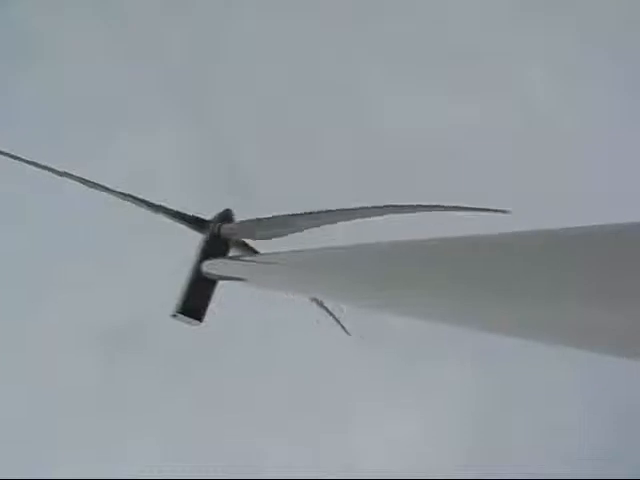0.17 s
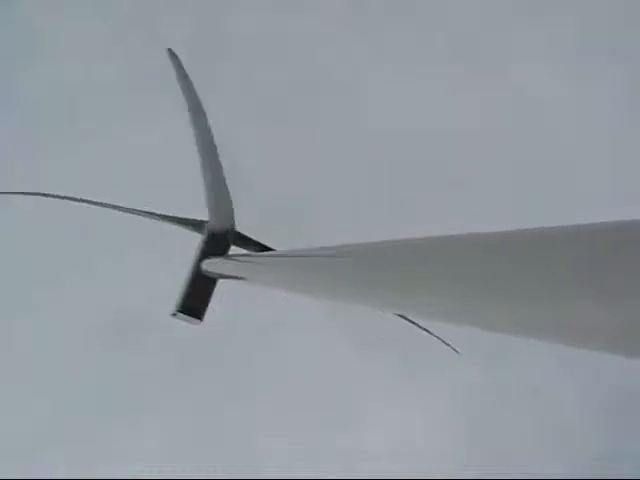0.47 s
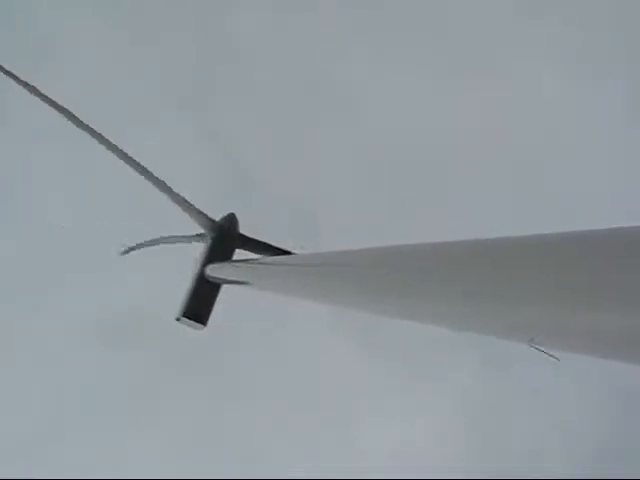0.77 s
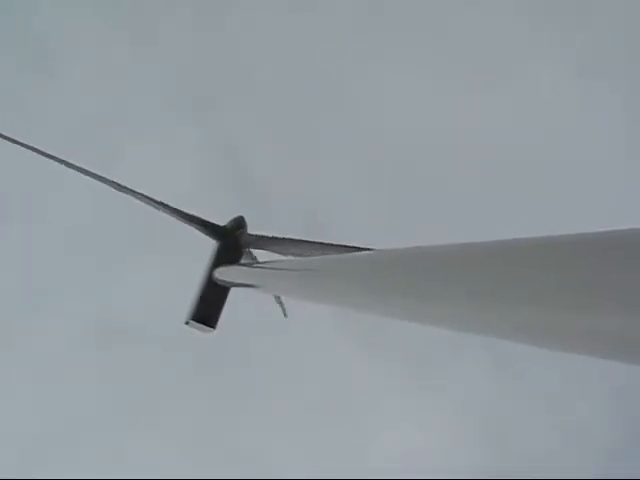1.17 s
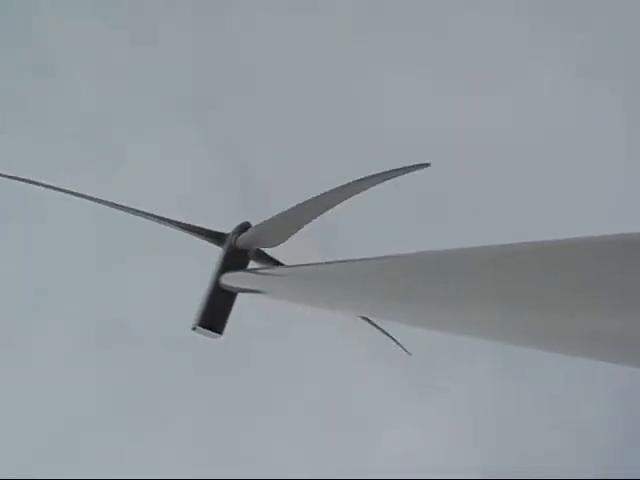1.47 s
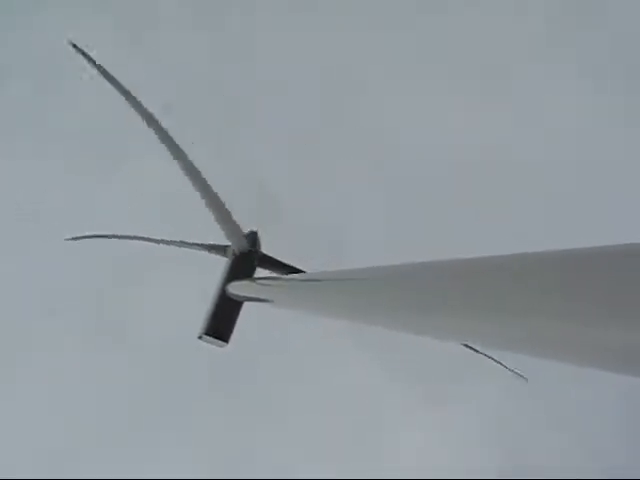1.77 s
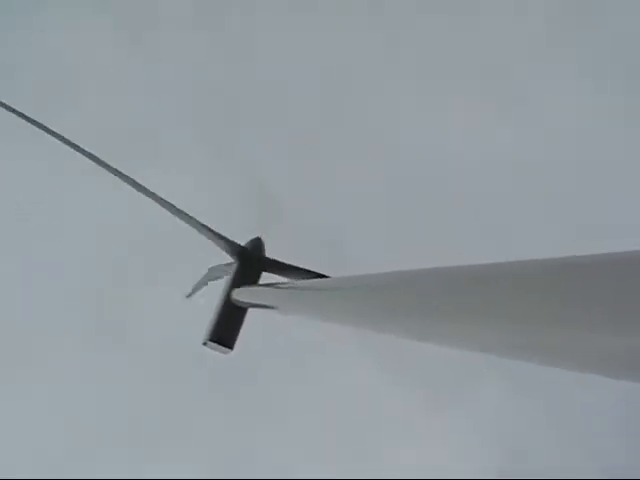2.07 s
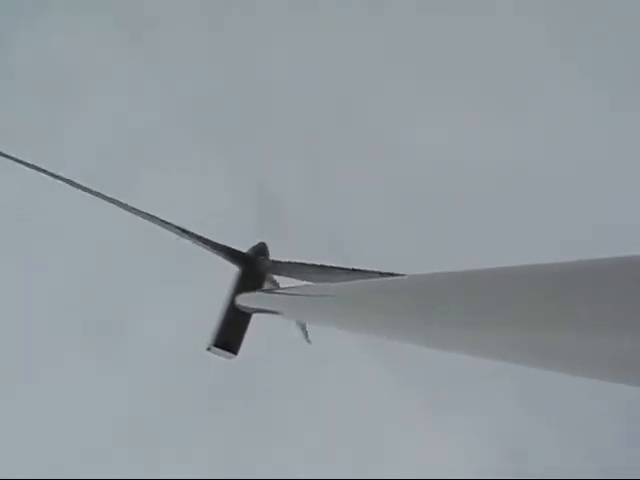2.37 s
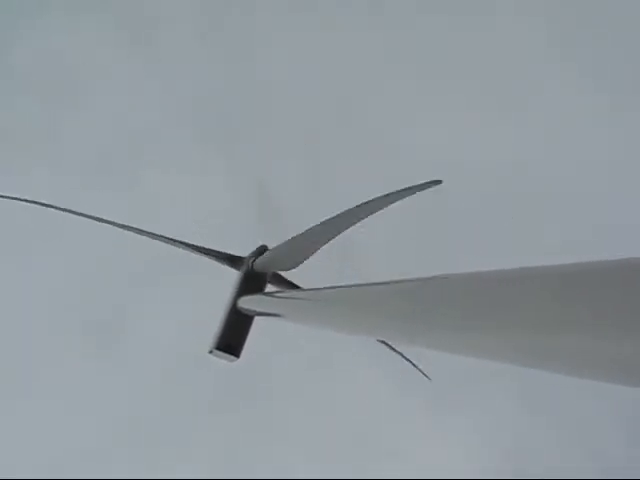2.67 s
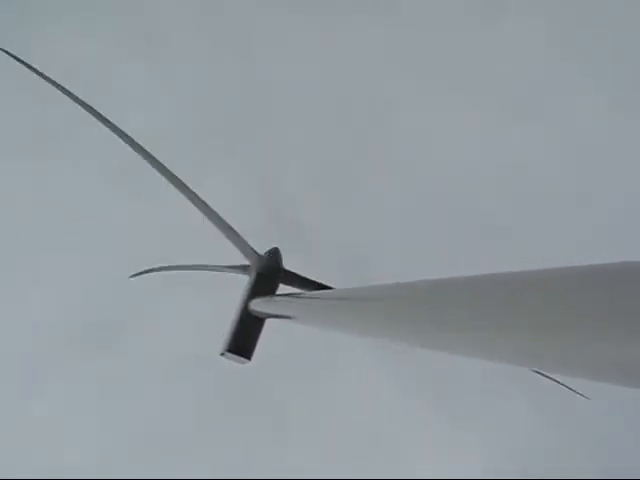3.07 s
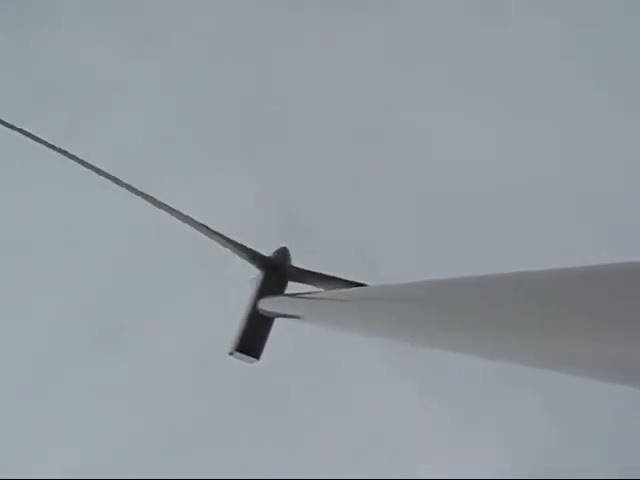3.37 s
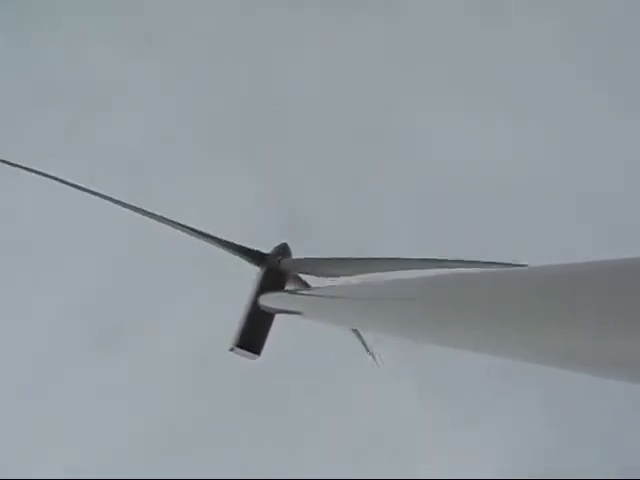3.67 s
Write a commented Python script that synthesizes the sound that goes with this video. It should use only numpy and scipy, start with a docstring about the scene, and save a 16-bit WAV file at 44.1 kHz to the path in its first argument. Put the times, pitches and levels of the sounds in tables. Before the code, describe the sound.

Strong wind buffets a cheap, unshielded microphone outdoors in irregular thumps and deep rumble; beneath it large turbine blades pass overhead with soft airy swishes, roughly one every second or less, over faint gritty hiss.

```python
"""Under a wind turbine: blades swish overhead while gusts buffet a small camera microphone.
The buffeting is a stream of short pressure puffs over rolling noise and a deep rumble; the strongest puffs
are placed one by one. The swish, its bright surges and a steady hiss are filtered noise; a small tick is
damped rings and the faint whistles are gliding tones.
The recorder samples slowly and holds each sample, mirroring the bass into the treble."""
import sys
import numpy as np
from scipy import signal
from scipy.io import wavfile

SR = 44100
rng = np.random.default_rng(int(sys.argv[2]) if len(sys.argv) > 2 else 0)


def dump_mix(stems):
    """Bounce the given channels to the path in sys.argv[1] as a 16-bit WAV at rate SR."""
    frames = np.atleast_2d(stems).T  # one column per channel
    limited = np.clip(frames, -1, 1)  # hard clip at full scale
    pcm = np.round(limited * 32767).astype(np.int16)
    wavfile.write(sys.argv[1], SR, pcm)


def boost(x):
    """Linear amplitude factor 10**(x/20) for a level x in decibels (scalar or array-like)."""
    u = np.asarray(x, float) / 20
    return 10 ** u


N = 168462   # length of the sound [samples]


def rms_one(x):
    """Scale to an rms (average strength) of 1."""
    return x / np.sqrt(np.mean(x ** 2) + 1e-20)


def in_time(rows):
    """Read every column of a timed table at every sample, with straight lines between rows."""
    times, *columns = np.transpose(rows)
    return [np.interp(np.arange(N) / SR, times, column) for column in columns]


def at_hz(points, hz):
    """Read a (frequency, value) table on a log-frequency axis."""
    table_hz, values = np.transpose(points)
    return np.interp(np.log(hz), np.log(table_hz), values)


def drift(rate_hz):
    """Random wandering of rms 1: noise smoothed twice, made at every 40th sample and joined by lines."""
    r = np.exp(-2 * np.pi * rate_hz * 40 / SR)
    noise = rng.standard_normal(N // 40 + 2002)
    slow = signal.lfilter([1], [1, -2 * r, r * r], noise)[2000:]   # leave out the filter's start
    return np.interp(np.arange(N) / 40, np.arange(len(slow)), rms_one(slow - slow.mean()))


def band_pass(x, low_hz, high_hz):
    """Keep the sound between two frequencies."""
    return signal.sosfilt(signal.butter(2, [low_hz, high_hz], "band", fs=SR, output="sos"), x)


def bands(spectrum, low_hz, count, moving_db):
    """Third-octave noise bands, each with its level and moving gain; together rms 1 at rest."""
    edges = low_hz * 2 ** (np.arange(count + 1) / 3)
    white = rng.standard_normal((2, N))
    out, power = 0, 0
    for k, (low, high) in enumerate(zip(edges, edges[1:])):
        hz = np.sqrt(low * high)
        # neighbouring bands take turns with two separate noises
        band = boost(at_hz(spectrum, hz)) * band_pass(white[k % 2], low, high)
        out = out + band * boost(moving_db(hz))
        power = power + np.mean(band ** 2)
    return out / np.sqrt(power)


def puff(clicks, hz):
    """Five smoothing filters turn each click into a smooth hump of the click's height."""
    r = np.exp(-2 * np.pi * hz / SR)
    for _ in range(5):
        clicks = signal.lfilter([1 - r], [1, -r], clicks + 1e-18)
    return clicks * SR / hz / 1.23   # brings the top of the hump back to the click's height


def port(x):
    """The microphone port passes no steady pressure: a high-pass filter."""
    return signal.sosfilt(signal.butter(2, 143.4, "high", fs=SR, output="sos"), x)


def hiss():
    """Steady hiss of the recorder: white noise."""
    return boost(-51.5) * rng.standard_normal(N)


def buffeting():
    """Random puffs of several widths, mostly upward, over a roll, fluttering under the gust; a rumble below."""
    # strength of the puffs and roll together: (time [s], level [dB])
    gust = [(.17, -25), (.27, -20), (.29, -22), (.32, -17), (.35, -38), (.38, -20), (.41, -22), (.48, -35),
            (.58, -17), (.62, -32), (.64, -24), (.78, -23), (.79, -31), (.95, -32), (.97, -24), (1.07, -28),
            (1.08, -17), (1.18, -24), (1.21, -33), (1.27, -19), (1.32, -26), (1.35, -21), (1.55, -32),
            (1.57, -21), (1.6, -34), (1.65, -19), (1.83, -28), (1.87, -21), (2.06, -23), (2.18, -21),
            (2.26, -27), (2.29, -17), (2.31, -25), (2.39, -21), (2.41, -28), (2.49, -32), (2.51, -21),
            (2.69, -27), (2.75, -32), (2.83, -24), (2.96, -27), (2.98, -21), (3.0, -27), (3.04, -20),
            (3.075, -21), (3.09, -28), (3.13, -28), (3.145, -18), (3.21, -22), (3.26, -30), (3.34, -26),
            (3.36, -20), (3.44, -25), (3.48, -18), (3.5, -31), (3.54, -27), (3.56, -35), (3.6, -26),
            (3.67, -25), (3.69, -30), (3.73, -26), (3.77, -40), (3.82, -28)]
    # widths of puff: (smoothing cutoff [Hz], height against the others [dB])
    puff_sizes = [(170, -1.5), (270, -3), (420, -5.5), (620, -7), (900, -14)]
    # colour of the turbulent roll between puffs: (frequency [Hz], relative density [dB per Hz])
    roll_colour = [(59, -31), (100, -5), (157, 2), (445, -6.5), (882, -22.5), (1000, -22), (1300, -52),
                   (2200, -120)]
    # colour of the deep rumble: (frequency [Hz], relative density [dB per Hz])
    rumble_colour = [(15, -37), (25, -9), (49, -2.5), (120, -2), (160, -30), (260, -120)]
    # strength of the deep rumble: (time [s], level [dB])
    rumble_level = [(0.17, -25.5), (0.24, -26), (0.35, -32), (0.41, -29), (0.46, -47), (0.59, -27),
                    (0.61, -46), (0.775, -25), (0.8, -42), (0.94, -47), (0.97, -23.5), (1.26, -35),
                    (1.34, -30), (1.4, -32.5), (1.85, -28.5), (1.93, -46), (2.09, -21.5), (2.12, -31),
                    (2.18, -31), (2.6, -29.5), (2.65, -21), (2.74, -38), (2.84, -26), (2.87, -38.5),
                    (2.99, -25), (3.82, -36)]
    puffs_per_s, spread_db, upward_share = 130, 2, .7
    roll_db = -3.5   # roll against the puffs
    flutter_db, flutter_hz = 2.08, 30

    height = boost(spread_db * np.minimum(rng.exponential(1, N), 3.5))
    direction = np.where(rng.random(N) < upward_share, 1, -1)
    born = rng.random(N) < puffs_per_s / SR
    clicks = height * direction * born
    size = rng.integers(0, len(puff_sizes), N)
    puffs = port(sum(boost(db) * puff(clicks * (size == k), hz) for k, (hz, db) in enumerate(puff_sizes)))

    roll = bands(roll_colour, low_hz=93.5, count=10, moving_db=lambda hz: 2.0 * drift(7.6))
    mix = rms_one(rms_one(puffs) + boost(roll_db) * roll)
    rumble = bands(rumble_colour, low_hz=23.43, count=7, moving_db=lambda hz: 2.0 * drift(4.8))
    gust_gain = boost(in_time(gust)[0] + flutter_db * drift(flutter_hz))
    return mix * gust_gain + rumble * boost(in_time(rumble_level)[0])


def swish():
    """Trailing-edge noise of the blades: noise bands that each follow the swing in their own share."""
    # course of the swish: (time [s], level before the lift below [dB], top octave against it [dB])
    swish_course = [(0.17, -38.5, -11), (0.18, -49, -3), (0.2, -42.5, -11), (0.21, -42.5, -11),
                    (0.29, -51.5, -6), (0.46, -47.5, -8), (0.55, -43.5, -7), (0.64, -43, -10),
                    (0.69, -44, -11), (0.73, -40, -13), (0.82, -41, -10), (0.91, -37.5, -15),
                    (1.01, -41, -12), (1.08, -38, -17), (1.13, -51, -6), (1.5, -50.5, -8.5),
                    (1.64, -40, -11), (1.69, -49, -4), (1.92, -48.5, -2), (1.95, -50.5, -8),
                    (1.99, -44.5, -10), (2.04, -54.5, -2), (2.09, -46.5, -9), (2.2, -48, -8.5),
                    (2.28, -43.5, -13), (2.37, -49, -6), (2.39, -47, -11), (2.43, -54.5, -6.5),
                    (2.74, -43.5, -14), (2.77, -40, -12.5), (2.95, -36.5, -16), (3.05, -42, -12),
                    (3.2, -50.5, -8.5), (3.345, -47.5, -11), (3.36, -51, -5), (3.42, -52, -9),
                    (3.76, -43.5, -9.5), (3.81, -42.5, -17), (3.82, -45, -6)]
    # colour of the swish: (frequency [Hz], relative density [dB per Hz])
    colour = [(200, -9), (500, 6), (950, 3), (1150, -7.5), (1600, -7.5), (2300, -6.5), (3100, -8.5),
              (4200, -13), (5500, -18)]
    # how far each pitch follows the level: (frequency [Hz], share of the swing [1])
    follows = [(300, 1.6), (900, 0.7), (1500, 0.76), (2500, 0.97), (4000, 0.87), (5500, 1.08)]
    # how far each pitch follows the top octave: (frequency [Hz], share of its swing [1])
    follows_top = [(2500, 0.019), (3500, 0.35), (4600, 0.85)]
    lift_db, patchy_db = 9.5, 0.79

    level, top = in_time(swish_course)
    swing, top_swing = level - level.mean(), top - top.mean()

    def moving_db(hz):
        """Gain of one band: its share of both swings and a little random patchiness."""
        shared = at_hz(follows, hz) * swing + at_hz(follows_top, hz) * top_swing
        return shared + patchy_db * drift(5.7)

    return boost(level.mean() + lift_db) * bands(colour, low_hz=181.6, count=15, moving_db=moving_db)


def ticks():
    """A small tick on the body: short rings that die away evenly in dB."""
    # the rings: (start [s], starting level [dB], pitch [Hz], time to fall by 60 dB [s])
    rings = [(0.1974, -19.5, 3100, 0.0039), (0.1984, -23, 1214, 0.04)]
    t = np.arange(N) / SR
    out = 0
    for s, db, hz, t60 in rings:
        fading = boost(db - 60 * np.maximum(t - s, 0) / t60) * (t > s)
        out = out + fading * np.sin(2 * np.pi * hz * (t - s))
    return out


def slaps():
    """The strongest puffs and drops in pressure: a sharp hump, up or down, that swings back in the port."""
    # strongest single puffs: (time of the top [s], height before the port [dB], smoothing cutoff [Hz])
    pushes = [(0.224, -7.5, 600), (0.268, -6.5, 915), (0.308, -11, 740), (0.318, -8, 790), (0.386, -3, 835),
              (0.405, -16, 720), (0.562, -9.5, 810), (0.593, -11, 855), (0.719, -6.5, 900),
              (0.767, -10, 860), (1.079, -6.5, 960), (1.088, -4.5, 860), (1.17, -9.5, 1060),
              (1.244, -13.5, 935), (1.274, -2.5, 810), (1.301, -8, 750), (1.358, -6, 720),
              (1.654, -12, 880), (1.667, -5, 935), (1.734, -12.5, 1150), (1.742, -10, 520),
              (1.772, -11, 686), (1.809, -13.5, 517), (1.854, -6.5, 650), (1.876, -8, 1000),
              (1.928, -12, 750), (1.935, -11.5, 910), (1.965, -12, 870), (2.008, -7.5, 870),
              (2.017, -9.5, 1080), (2.056, -8.5, 1320), (2.072, -19, 1000), (2.088, -7.5, 1280),
              (2.111, -10.5, 920), (2.16, -8, 750), (2.185, -14, 600), (2.208, -3.5, 646),
              (2.288, -18, 800), (2.337, -11, 600), (2.376, -8.5, 585), (2.387, -7, 740), (2.394, -14, 950),
              (2.507, -11.5, 990), (2.526, -9.5, 766), (2.56, -15, 1100), (2.614, -12.5, 700),
              (2.833, -9, 810), (2.863, -11, 890), (3.023, -4.5, 860), (3.042, -8.5, 663), (3.075, -7, 480),
              (3.137, -6.5, 600), (3.145, -5.5, 700), (3.186, -1.5, 660), (3.207, -12.5, 1050),
              (3.354, -10, 600), (3.367, -5.5, 740), (3.383, -22, 900), (3.425, -10.5, 960),
              (3.458, -6, 1080), (3.473, -8.5, 840), (3.481, -9.5, 850), (3.605, -15, 704),
              (3.667, -9, 730)]
    # single drops in pressure: (time of the bottom [s], depth before the port [dB], smoothing cutoff [Hz])
    pulls = [(0.549, -13, 705), (1.837, -13, 350), (1.873, -9.5, 600), (3.305, -10.5, 300),
             (3.381, -6.5, 900)]
    out = np.zeros(N)
    for rows, direction in [(pushes, 1), (pulls, -1)]:
        for s, db, hz in rows:
            click = np.zeros(N)
            click[int((s - 2 / (np.pi * hz)) * SR)] = direction * boost(db)   # the hump peaks after its click
            out += puff(click, hz)
    return port(out)


def swell(s, length):
    """A smooth rise and fall, and the share of its length gone."""
    gone = np.clip((np.arange(N) / SR - s) / length, 0, 1)
    return np.sqrt(np.abs(np.sin(np.pi * gone))) * (gone < 1), gone


def whistles():
    """Faint whistles off a blade: thin gliding tones that waver in pitch and level."""
    # the tones: (start [s], length [s], first pitch [Hz], last pitch [Hz], level before wavering [dB])
    tones = [(.33, .045, 3980, 3970, -60), (.885, .05, 1520, 1600, -47), (3.295, .065, 3850, 3950, -52),
             (3.7, .09, 4080, 4280, -59)]
    out = 0
    for s, length, from_hz, to_hz, db in tones:
        shape, gone = swell(s, length)
        hz = from_hz + (to_hz - from_hz) * gone + 25 * drift(30)
        tone = np.sin(2 * np.pi * np.cumsum(hz) / SR)
        out = out + boost(db + 3.0 * drift(30)) * shape * tone
    return out


def surges():
    """Short bright surges of the swish: bands of noise that each swell once."""
    # the surges: (start [s], length [s], level before the swell [dB], low edge [Hz], high edge [Hz])
    bursts = [(.87, .08, -45, 2100, 3600), (1.595, .09, -43, 3000, 6000), (2.24, .08, -50, 1800, 4200),
              (2.915, .075, -42, 2000, 3300), (3.295, .065, -50, 2800, 4000)]
    white = rng.standard_normal(N)
    out = 0
    for s, length, db, low_hz, high_hz in bursts:
        shape, _ = swell(s, length)
        out = out + boost(db) * shape * rms_one(band_pass(white, low_hz, high_hz))
    return out


def scene():
    """All sources added at one microphone, silent until the start."""
    start_s = .165
    mix = hiss() + buffeting() + swish() + ticks() + slaps() + whistles() + surges()
    return (mix * (np.arange(N) > start_s * SR))[None]


def low_pass(x):
    """Removes everything above the highest recorded frequency."""
    return signal.sosfilt(signal.butter(12, 15570, fs=SR, output="sos"), x)


def record(dry):
    """Peaks are rounded and treble cut, then every fourth sample is held for four, mirroring the bass."""
    ceiling, hold = .42, 4   # [full scale], [samples]
    rounded = ceiling * np.tanh(dry / ceiling)
    dull = signal.sosfilt(signal.butter(4, 5700, fs=SR, output="sos"), rounded)
    held = np.repeat(dull[:, ::hold], hold, axis=1)[:, :N]
    return low_pass(held)


dry = scene()
out = record(dry)
dump_mix(out)
```